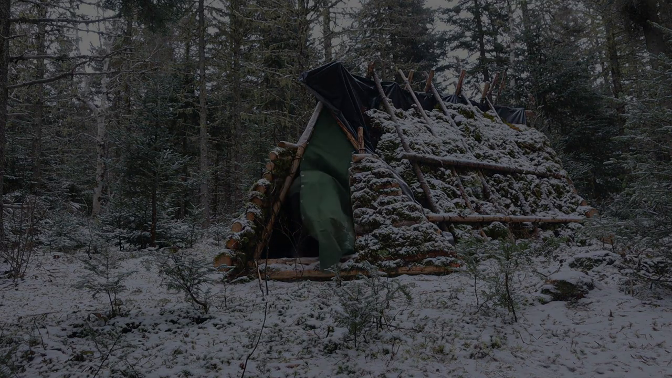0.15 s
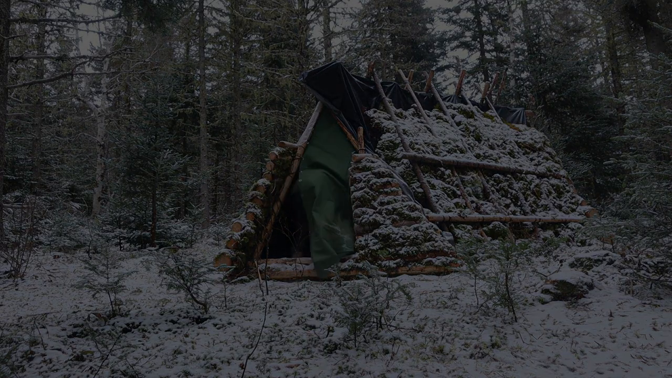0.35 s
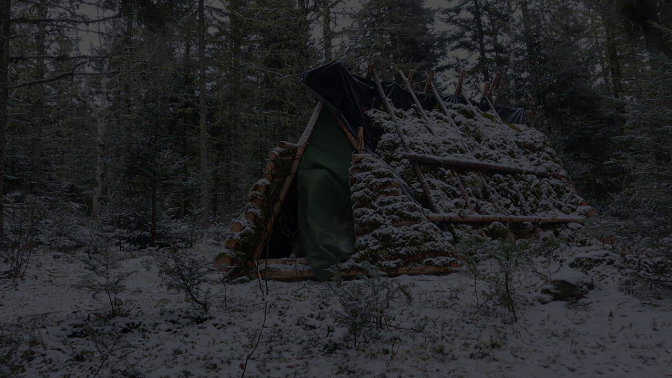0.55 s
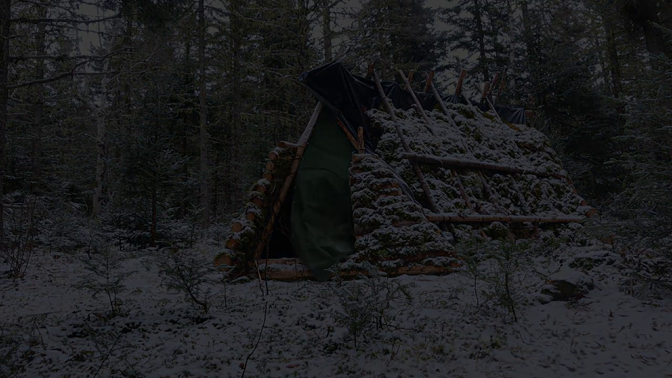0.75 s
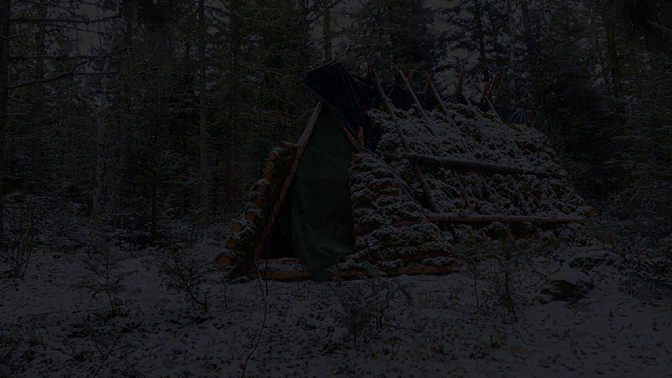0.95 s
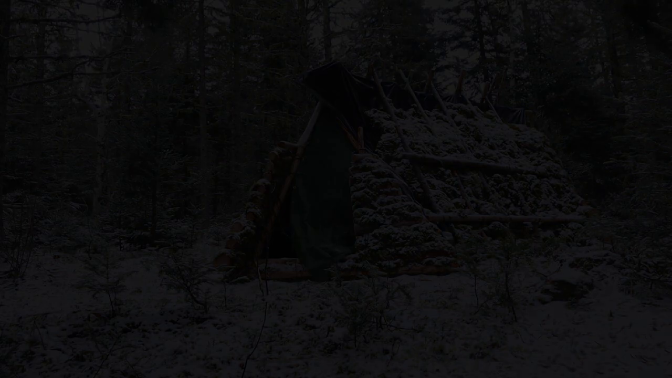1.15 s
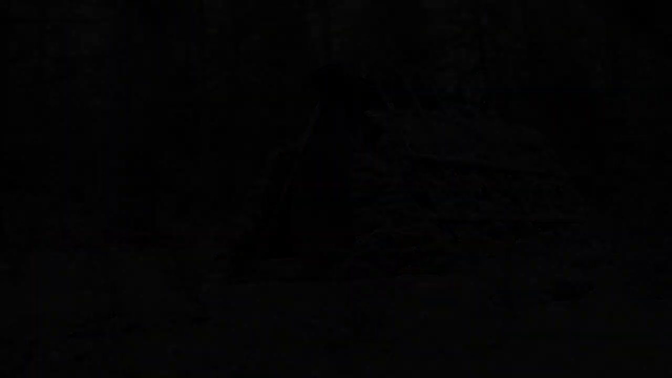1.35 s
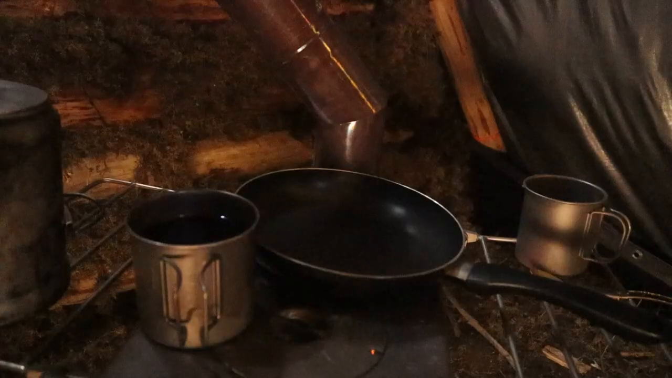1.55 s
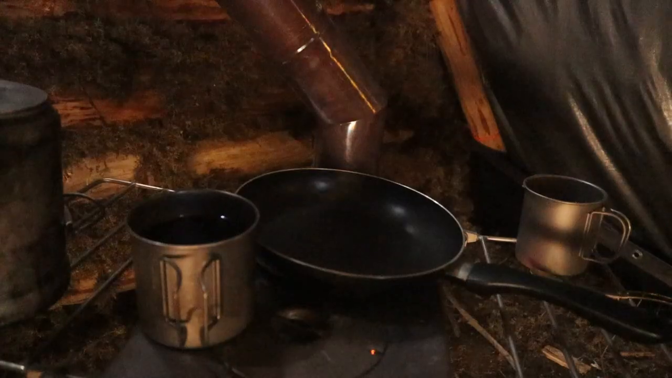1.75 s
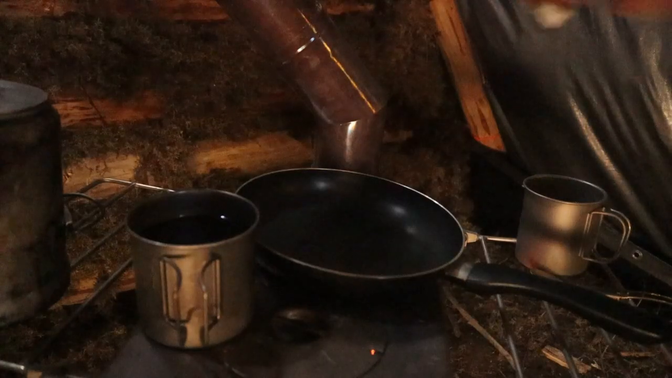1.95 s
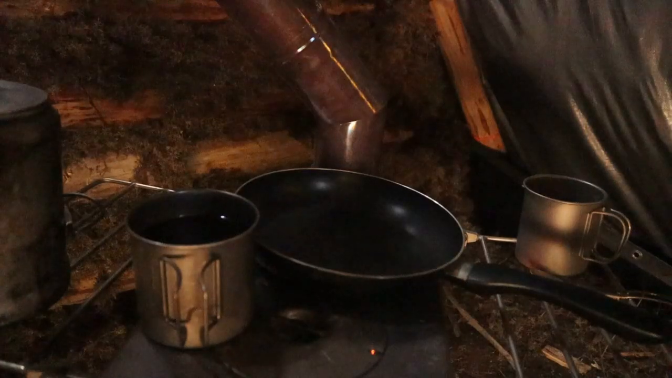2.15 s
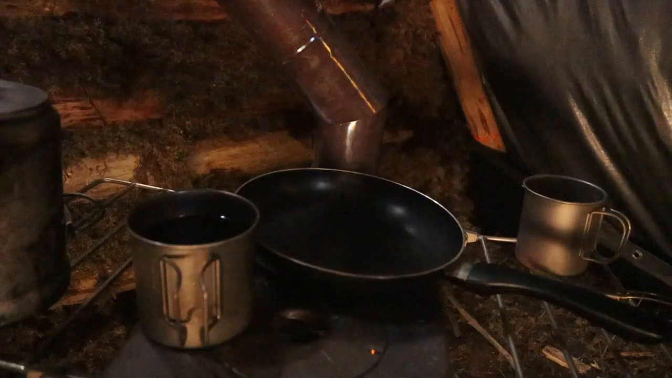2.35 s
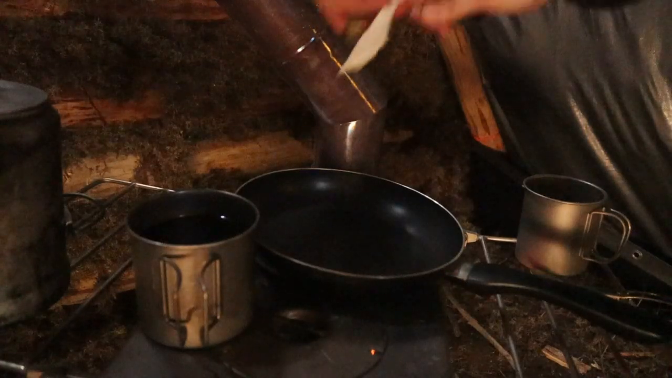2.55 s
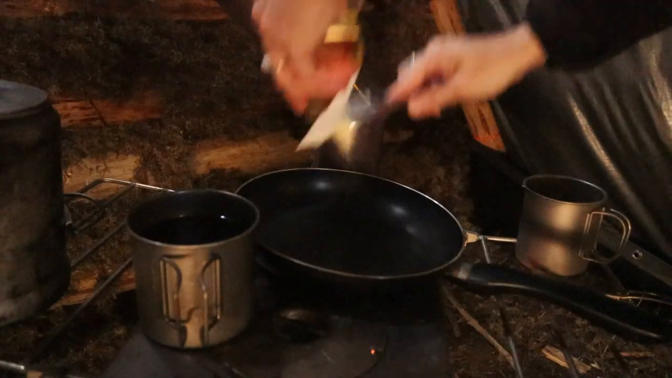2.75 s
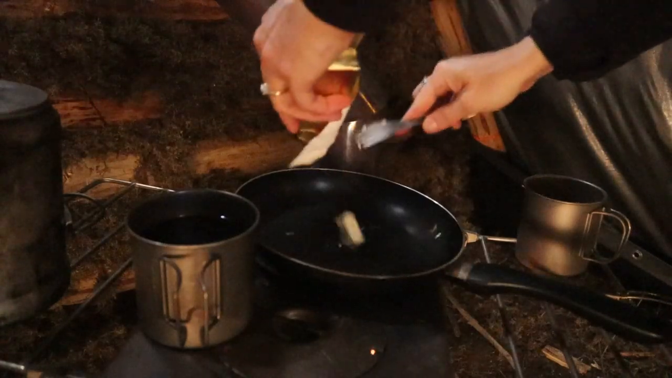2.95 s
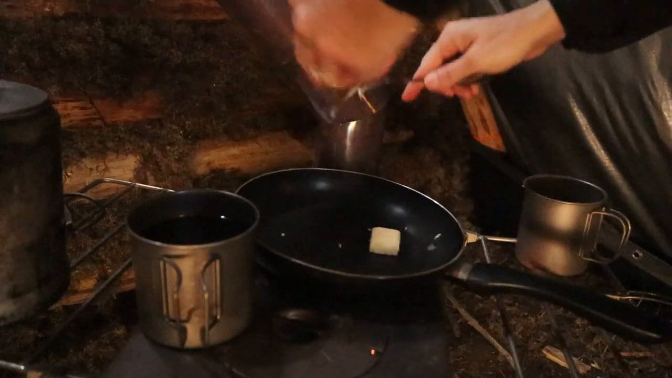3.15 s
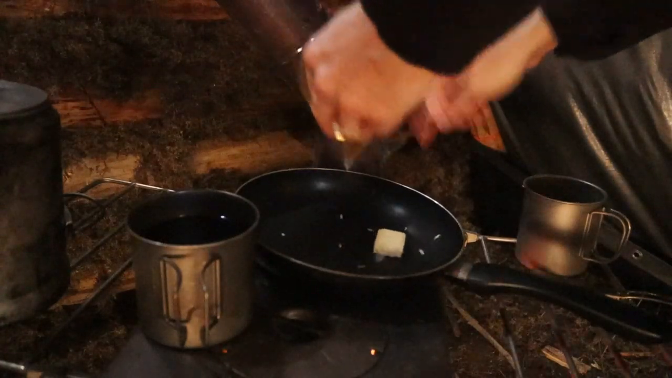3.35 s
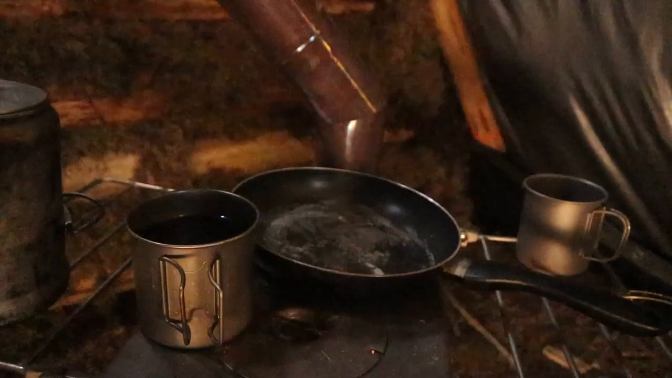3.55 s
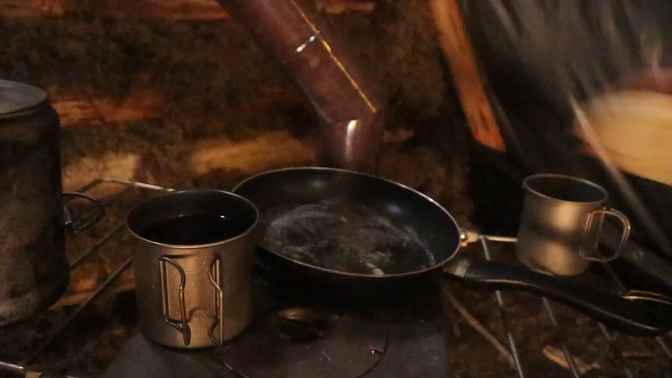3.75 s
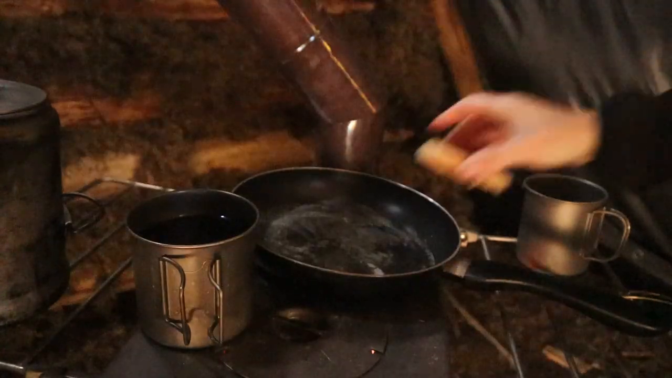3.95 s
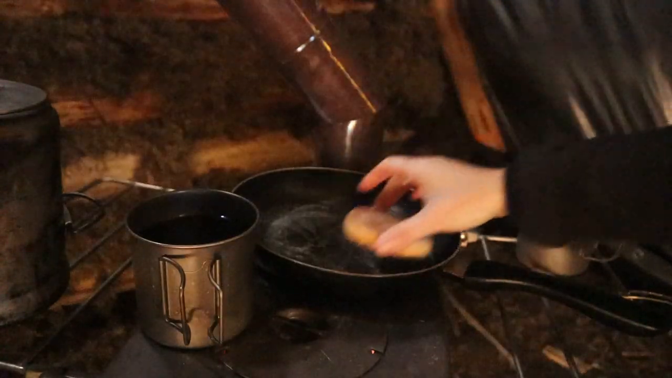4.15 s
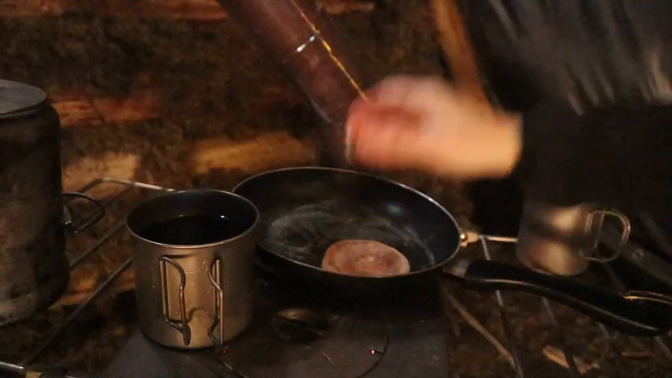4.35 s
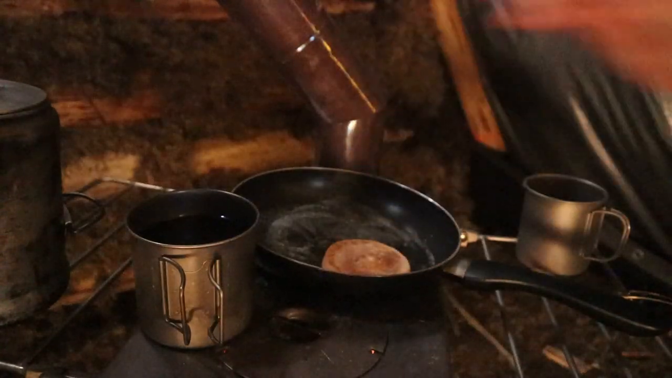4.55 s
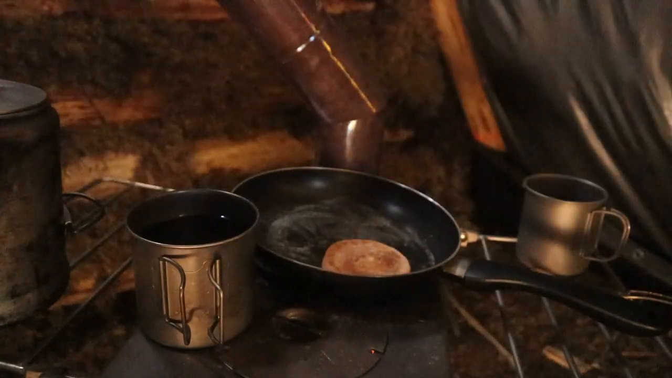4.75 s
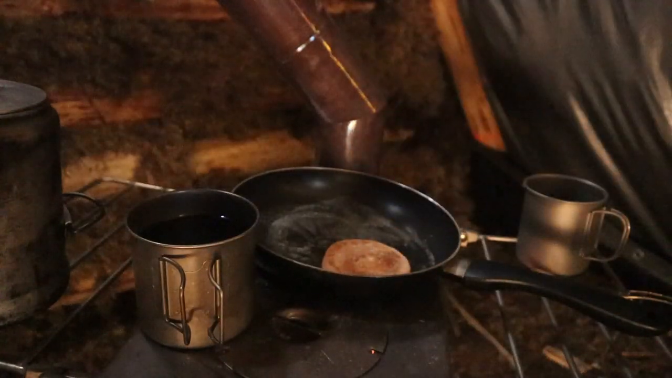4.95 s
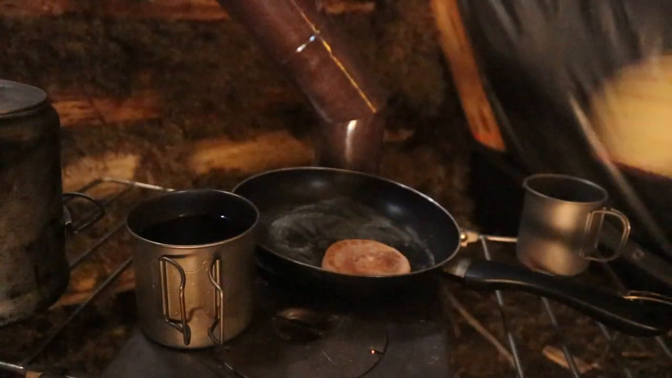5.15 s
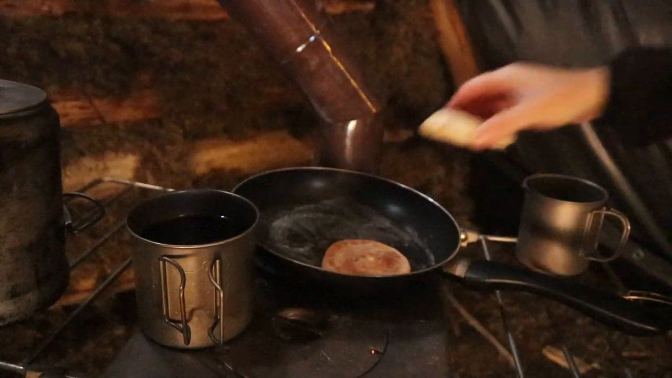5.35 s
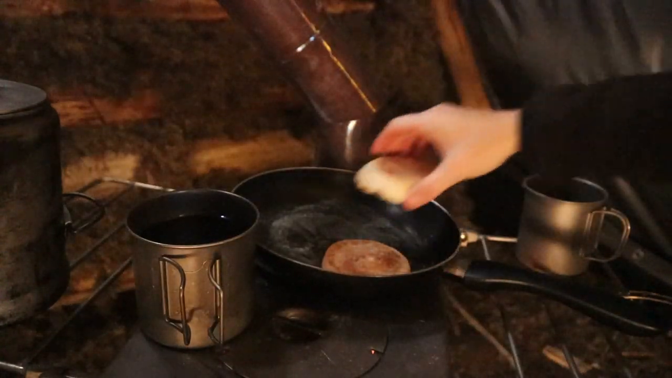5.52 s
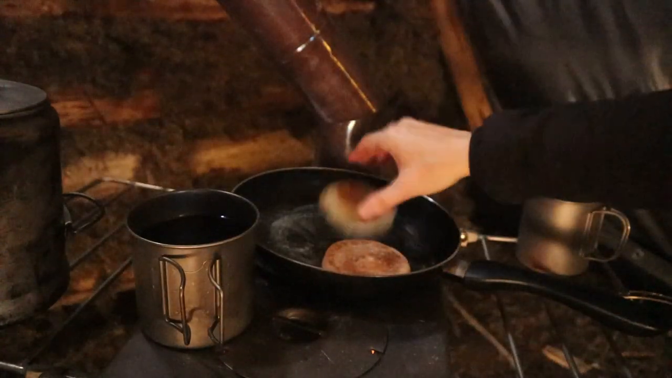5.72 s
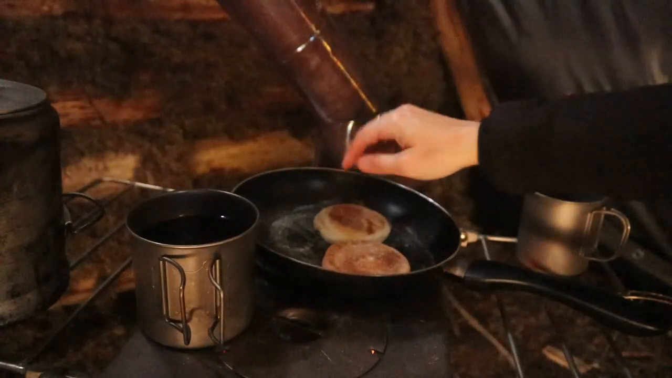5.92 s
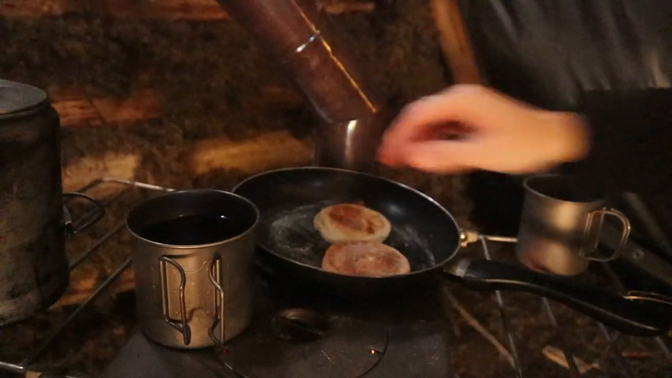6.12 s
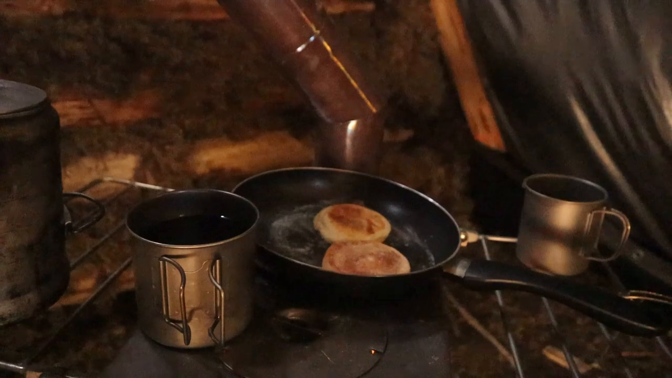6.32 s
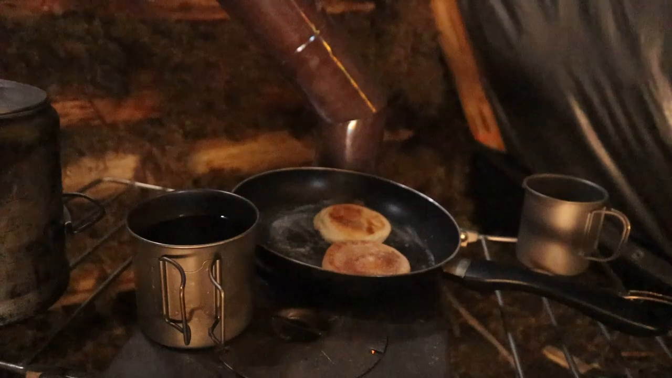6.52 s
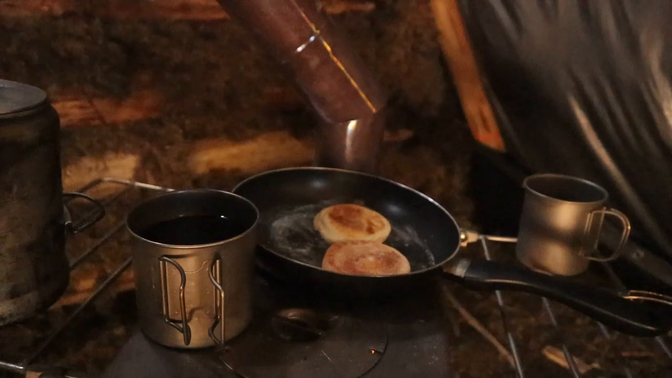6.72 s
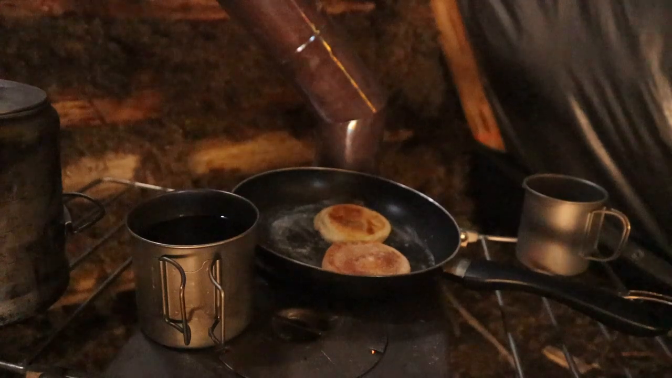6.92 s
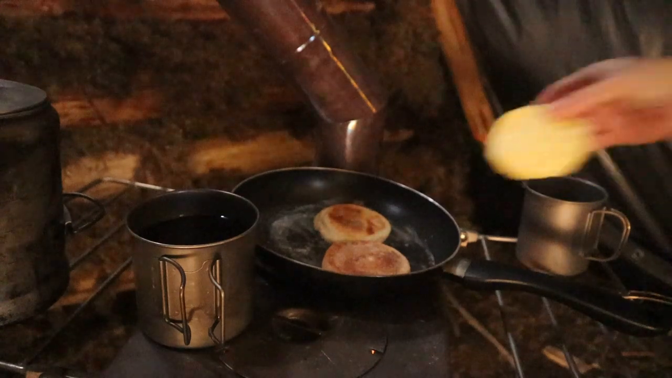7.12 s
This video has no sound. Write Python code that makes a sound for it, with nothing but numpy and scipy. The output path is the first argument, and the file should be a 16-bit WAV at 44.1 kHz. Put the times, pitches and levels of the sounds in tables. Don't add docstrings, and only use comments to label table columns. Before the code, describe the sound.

A steady soft hiss and low draughty rumble lie underneath. From 0 to 1.5 s, outside, a coarse tarp door rustles, strongest at first, with a dull footfall at once, a softer thump near 0.5 and a deep double step at 1.2. At 1.5 the scene cuts to a stove inside: a stiff wrapper crinkles and snaps, with small knocks, a heavier bump at 2.06, a sharp snap at 2.4 and knife ticks around 2.7. At 2.9 butter cracks into the bare pan, bright, ringing and briefly overloaded, bouncing more softly at 3.07. Wrapper clicks follow, cut by a tiny silence at 3.44. Then it is quieter: hiss and sleeves. A bun slaps down at 4.29 with a short rattle and low stove boom. Cloth swishes and a snap come near 5.4; the second bun lands at 5.8, drier. Faint taps near 6.6 and 6.9 and a soft final thud at 7.1.

```python
import sys
import numpy as np
from scipy import signal
from scipy.fft import rfft, irfft, next_fast_len
from scipy.io import wavfile
from scipy.ndimage import uniform_filter1d

SR = 44100
rng = np.random.default_rng(int(sys.argv[2]) if len(sys.argv) > 2 else 0)


def makeup_ratio(level_db):
    decades = np.asarray(level_db, float) / 20
    return 10 ** decades


def generate_wav(sig):
    pcm = np.round(np.clip(np.atleast_2d(sig).T, -1, 1) * 32767).astype(np.int16)
    wavfile.write(sys.argv[1], SR, pcm)


N = 316638


def evened(x):
    return x / np.sqrt(np.mean(x ** 2) + 1e-20)


def read(points, hz):
    f, value = np.transpose(points)
    return np.interp(np.log(hz + 1), np.log(f + 1), value)


def add(mix, s, sound):
    part = mix[round(s * SR):][:len(sound)]
    part += sound[:len(part)]


def coloured(x, points):
    size = next_fast_len(len(x))
    gain = makeup_ratio(read(points, np.fft.rfftfreq(size, 1 / SR)))
    return irfft(rfft(x, size) * gain, size)[:len(x)]


def seconds(length):
    return np.arange(round(length * SR)) / SR


def wavering(size, smooth):
    return evened(uniform_filter1d(rng.standard_normal(size), size=smooth))


def ring(modes, t):
    return sum(makeup_ratio(db - 60 * t / t60) * np.sin(2 * np.pi * hz * t) for hz, db, t60 in modes)


def swells(t, rows):
    return np.array([makeup_ratio(db - 10 * np.maximum((s - t) / rise, (t - s) / fall)) ** 2
                     for s, db, rise, fall, *_ in rows])


# f/Hz, level/dB per Hz
SOFT_HISS = [(120, -33), (200, -6.5), (249, -12.5), (380, -1.5), (464, -3), (600, -2), (1940, -6.5),
             (2410, -6.5), (2900, -7), (6370, -7.5), (12300, -13.5), (15100, -15.5), (15900, -25)]


def microphone_hiss():
    return makeup_ratio(-61.5) * evened(coloured(rng.standard_normal(N), SOFT_HISS))


# f/Hz, level/dB per Hz
RUMBLE = [(12, -28), (20, -21), (30, -16), (45, 1), (113, -2.5), (161, -3), (253, -5.5), (300, -4.5),
          (390, -20), (660, -120)]
# peak t/s, level/dB, rise/s per 10 dB, fall/s per 10 dB
DRAUGHTS = [(.11, -48, 0.66, 0.21), (.99, -50, 0.3, 0.3), (1.66, -49, 0.3, 0.08), (2.13, -47, 0.15, 0.15),
            (2.56, -47, 0.2, 0.15), (3.0, -46, 0.1, 0.2), (3.36, -51.5, 0.5, 0.25),
            (3.96, -50.5, 0.17, 0.11), (4.5, -48, 0.18, 0.25), (4.95, -57, 0.18, 0.6),
            (5.93, -52.5, 0.3, 0.4), (6.72, -57, 0.5, 0.5)]


def draught_rumble(t, rest_db):
    noise = evened(coloured(rng.standard_normal(len(t)), RUMBLE))
    return noise * np.sqrt(makeup_ratio(rest_db) ** 2 + swells(t, DRAUGHTS).sum(0))


def rustle(shot, moves, colour, patchy_db, flicker_db, crackle_db, slips_per_s):
    start, end, rest_db, rumble_db = shot
    size = round((end - start) * SR)
    t = start + np.arange(size) / SR

    slip_sizes = makeup_ratio(1.3 * np.minimum(rng.exponential(1, size), 5))
    slips = slip_sizes * (rng.random(size) < slips_per_s / SR)
    slips = signal.oaconvolve(slips, makeup_ratio(-60 * seconds(.01) / 0.0031))[:size]
    drive = rng.standard_normal(size) * (1 + makeup_ratio(crackle_db) * evened(slips))

    hz, at, z = signal.stft(drive, SR, nperseg=256, noverlap=192)
    patches = uniform_filter1d(rng.standard_normal(z.shape), size=3, axis=0)
    patches = evened(uniform_filter1d(patches, size=30, axis=1))
    flicker = wavering(len(at), 14)
    z = z * makeup_ratio(patchy_db * patches + flicker_db * flicker)
    drive = signal.istft(z, SR, nperseg=256, noverlap=192)[1][:size]

    hiss = coloured(drive, colour)
    body = coloured(hiss, [(1500, 0), (2500, -6), (5000, -30)])
    power = swells(t, moves)
    brightness = makeup_ratio(np.array(moves)[:, 4]) ** 2
    dull_level = np.sqrt(makeup_ratio(rest_db) ** 2 + power.sum(0))
    bright_level = np.sqrt(makeup_ratio(rest_db) ** 2 + brightness @ power)
    sound = evened(body) * dull_level + evened(hiss - body) * bright_level
    sound = sound + makeup_ratio(-4.5) * draught_rumble(t, rumble_db)
    return start, sound * np.minimum(np.arange(size) / 150, 1)


# start t/s, end t/s, rustle level at rest/dB, rumble level at rest/dB
SHOTS = [
    (0, 1.505, -59, -58.5),
    (1.512, 3.432, -56, -56),
    (3.444, 7.18, -64, -59.5),
]
# f/Hz, level/dB per Hz
TARP = [(120, -16), (200, -2.5), (258, -8), (299, -7), (464, -4), (528, -7), (611, -0.5), (1370, 1.5),
        (2240, -7.5), (3300, -5.5), (3960, -12), (8240, -12.5), (9200, -15), (10000, -25), (12800, -18),
        (14400, -24), (15900, -27)]
# peak t/s, level/dB, rise/s per 10 dB, fall/s per 10 dB, brightness/dB
TARP_MOVES = [
    (.09, -44, 0.15, 0.12, -3),
    (.21, -42, 0.4, 0.25, -1),
    (.41, -46.5, 0.1, 0.22, 1.5),
    (.66, -53.5, 0.06, 0.2, 1),
    (.97, -53, 0.64, 0.35, -5.5),
]


def tarp_rustle():
    return rustle(SHOTS[0], TARP_MOVES, TARP, 1.5, 0.43, -21, 660)


# t/s, peak level/dB, f/Hz, t60/s
THUMPS = [(0.04, -19, 166, 0.03), (.08, -36, 249, 0.056), (0.457, -35.5, 190, 0.0344),
          (0.661, -46.5, 255.7, 0.17), (.785, -49, 155.5, 0.14), (.86, -46, 253.2, 0.16),
          (0.893, -35, 259, 0.069), (1.1697, -31, 160.4, 0.096), (1.1837, -29.5, 155, 0.081),
          (1.525, -40, 137, 0.062), (2.0635, -25.5, 191, 0.1), (3.6, -44, 119, 0.16),
          (3.661, -45, 124.7, .1), (3.795, -43.5, 124, 0.119), (7.071, -51.5, 100, .1),
          (7.136, -43.5, 110, 0.102)]


def thump(s, db, hz, t60):
    t = seconds(0.35)
    wobble = 1 + 0.26 * wavering(len(t), 300)
    body = ring([(hz, db, t60), (1.354 * hz, db - 12.5, t60)], t)
    return s, body * wobble * np.minimum(t / 0.003, 1)


# t/s, peak level/dB, f/Hz, t60/s
BOOMS = [
    (.04, -32.5, 68.5, 0.34),
    (1.171, -35.5, 55.84, 0.81),
    (1.525, -45.5, 49.8, 0.72),
    (2.061, -37.5, 51.32, 0.95),
    (7.09, -50.5, 59, 0.97),
]


def ground_boom(s, db, hz, t60):
    t = seconds(.7)
    wobble = 1 + 0.24 * wavering(len(t), 300)
    sag = hz * (1 + 0.8 * np.exp(-t / 0.03))
    phase = 2 * np.pi * np.cumsum(sag * wobble) / SR
    return s, makeup_ratio(db - 60 * t / t60) * np.sin(phase) * np.minimum(t / 0.038, 1)


# t/s, peak level/dB, f/Hz, t60/s
KNOCKS = [(1.173, -37, 880, 0.031), (1.521, -38, 1130, 0.056), (1.726, -36, 800, 0.039),
          (1.757, -33, 700, 0.02), (2.064, -29, 2100, 0.031), (2.0645, -23, 380, 0.06),
          (2.372, -33, 740, 0.04), (2.763, -34, 1500, 0.04), (3.308, -29.5, 1300, 0.06),
          (3.312, -34, 800, .05), (3.322, -39, 680, .04), (3.295, -40, 620, .08), (3.349, -37, 684, 0.083),
          (3.354, -35, 650, .06), (3.364, -39, 560, .06), (4.689, -41, 1360, 0.032),
          (5.093, -41, 516, 0.03), (5.266, -39.5, 608, 0.034), (5.389, -33, 640, 0.05),
          (5.421, -29.5, 479, 0.029), (5.739, -34.5, 800, 0.0166), (6.567, -37, 842, 0.025),
          (6.611, -40, 640, 0.05), (6.942, -44, 1300, 0.031), (6.888, -47.5, 1500, .03),
          (2.553, -28, 1010, .03), (1.9, -32.5, 890, 0.031), (2.0635, -25, 880, 0.029),
          (2.071, -26, 1590, .03), (2.097, -37, 2450, .03), (2.112, -34, 2880, .04),
          (2.048, -34, 3300, .015), (1.82, -36, 700, .03), (1.811, -30.5, 2450, 0.078),
          (1.818, -31, 2900, .05), (1.986, -33, 1900, 0.046), (1.992, -32, 2450, .07),
          (1.68, -36, 800, .025), (1.702, -34, 780, .03), (1.918, -35, 950, .04), (2.679, -33, 528, .03),
          (1.635, -31, 1250, .05), (6.6145, -37, 600, .05)]


def knock(s, db, hz, t60):
    t = seconds(.15)
    puff_colour = [(hz / 3, -20), (hz, 0), (1.7 * hz, -14), (9000, -34), (16000, -45)]
    puff = evened(coloured(rng.standard_normal(len(t)), puff_colour))
    swing = (.3 + 1.6 * np.exp(-t * hz * .6)) * np.sin(2 * np.pi * hz * t)
    swing = swing * np.minimum(t * hz / 1.1, 1)
    return s, makeup_ratio(db - 60 * t / t60) * (swing + 0.55 * puff * np.minimum(t * hz, 1))


# t/s, peak
# level/dB, f/Hz, rise/ms
TICKS = [(2.7033, -26, 1300, .6), (2.7105, -33, 800, .8), (2.7408, -21, 1400, .65), (2.7582, -24, 1400, .8),
         (2.7797, -24, 1400, .6), (2.8242, -33, 1600, .5), (2.6868, -34, 900, .6), (3.2452, -31, 600, .8),
         (3.2506, -27, 750, .8), (3.2565, -37, 550, 1.2), (3.2225, -37, 500, 1.2), (3.3985, -31, 1500, .6),
         (3.4045, -32, 2200, .7), (3.4052, -31, 3700, .6), (2.9087, -11, 3400, .45),
         (2.3692, -21.5, 950, .9), (2.0628, -19, 1650, .7), (1.1742, -37, 1250, .8),
         (4.1515, -36, 620, 1.6), (4.1568, -41, 1300, .7), (1.7548, -22, 900, .6), (1.587, -27, 1000, .5),
         (1.7305, -29, 900, .8), (6.5705, -34, 1500, .4), (2.399, -26, 2500, .4), (1.899, -30, 1000, .6)]


def tick(s, db, hz, rise_ms):
    t = seconds(.02)
    u = t * 1000 / rise_ms
    first = makeup_ratio(db) * u ** 2 * np.exp(2 - 2 * u) * np.sin(2 * np.pi * hz * t)
    out = first.copy()
    echo_s, echo_db = .0037, -6.5
    add(out, echo_s, makeup_ratio(echo_db) * first)
    return s, out


# f/Hz, level/dB per Hz
WRAPPER = [(120, -32), (200, 0.5), (232, -5.5), (409, 1), (509, 4.5), (558, 0), (721, 3), (1300, -1),
           (2600, -8), (5210, -15), (6260, -12.5), (12800, -23.5), (15900, -27.5)]
# peak t/s, level/dB, rise/s per 10 dB, fall/s per 10 dB, brightness/dB
WRAPPER_MOVES = [(1.54, -44.5, 0.113, 0.15, 5), (1.62, -39, 0.11, 0.13, -4), (1.83, -46, 0.21, 0.18, 1.5),
                 (1.94, -43.5, 0.18, 0.2, -9.5), (2.23, -45, 0.3, 0.22, 2), (2.33, -42.5, 0.117, 0.12, -6),
                 (2.44, -43.5, 0.091, 0.108, 1.5), (2.55, -38, 0.146, 0.097, 1.5),
                 (2.72, -42, .13, 0.137, -0.5), (3.0, -43.5, .1, 0.23, -16), (3.33, -49, .2, 0.36, -5.5)]


def wrapper_rustle():
    return rustle(SHOTS[1], WRAPPER_MOVES, WRAPPER, 1.5, 0.53, -11.5, 660)


# t/s, peak level/dB, lowest f/Hz,
# highest f/Hz, t60/s
SNAPS = [(1.8095, -25.5, 1700, 9100, 0.24), (1.884, -27, 1805, 5960, 0.092),
         (1.9842, -24, 1600, 8630, 0.115), (2.03, -38.5, 9000, 14000, 0.019),
         (2.393, -19.5, 900, 13000, 0.0745), (3.2294, -35, 10500, 13980, 0.029),
         (3.2464, -41, 2490, 8000, 0.053), (3.3105, -34, 1800, 9000, 0.065), (3.364, -38, 1500, 4500, .03),
         (3.2965, -39, 1500, 3500, .04), (3.3985, -26, 1300, 4000, 0.043), (3.4028, -23, 2000, 8640, 0.065),
         (5.4495, -25.5, 2000, 10900, 0.069), (6.972, -37, 2500, 13100, 0.05),
         (6.967, -42, 2500, 9000, .06), (6.894, -45, 2800, 4200, .04), (2.9175, -17, 7200, 9000, .05),
         (2.926, -24, 4500, 12000, .06), (2.9087, -20, 7000, 13000, .07), (3.064, -34, 6800, 10000, .08),
         (5.422, -34, 2000, 4500, .03), (1.822, -30, 1800, 4000, .05), (1.7545, -25, 900, 5000, .03),
         (1.729, -30, 900, 4500, .04), (1.587, -31, 1000, 5000, .04), (1.85, -32, 1500, 4000, 0.12)]


def snap(s, db, low_hz, high_hz, t60):
    t = seconds(.2)
    grain = rng.standard_normal(len(t)) * makeup_ratio(2.5 * wavering(len(t), 40))
    colour = [(low_hz / 2, -24), (low_hz, 0), (high_hz, -5), (high_hz, -16), (2.8 * high_hz, -28)]
    burst = evened(coloured(grain, colour))
    return s, makeup_ratio(db - 8.0 - 60 * t / t60) * burst * np.minimum(t / 0.00061, 1)


# f/Hz, level/dB, held/s
DOME = (873.2, 0, 0.0195)


def pan(modes, blows, clatter_t60, linger_db, linger_t60, clatter,
        dome_pitch=1, dome_rise_ms=0.089, dome_longer=1):
    t, out = seconds(.5), np.zeros(N)
    rung = ring(modes, t)
    hz, db, held = DOME
    dome_envelope = (1 - np.exp(-(t * 1000 / dome_rise_ms) ** 2)) * np.exp(-(t / held / dome_longer) ** 5.0)
    dome = makeup_ratio(db - 60 * t / .15) * dome_envelope * np.sin(2 * np.pi * hz * dome_pitch * t)
    for s, db, contact_ms, clatter_db, *dome_db in blows:
        push = np.sin(np.pi * np.clip(t[:200] * 1000 / contact_ms, 0, 1))
        response = rung + sum(makeup_ratio(dome_db)) * dome
        add(out, s, signal.oaconvolve(makeup_ratio(db) * push / push.sum(), response))

        noise = evened(coloured(rng.standard_normal(len(t)), clatter))
        dull = coloured(noise, [(150, -23), (600, -1.5), (3000, -8), (7000, -20)])
        bright_part = makeup_ratio(-60 * t / clatter_t60) * noise
        lingering_part = makeup_ratio(linger_db - 60 * t / linger_t60) * dull
        add(out, s, makeup_ratio(clatter_db) * (bright_part + lingering_part))
    return signal.sosfilt(signal.butter(4, 190, "high", fs=SR, output="sos"), out)


# f/Hz, level/dB
CLATTER = [(200, -15.5), (500, -0.5), (1100, 9.5), (1900, 0), (3000, 0.5), (5500, -10), (8000, -6),
           (11000, -22.5), (16000, -22)]
# f/Hz, level/dB, t60/s
EMPTY_PAN = [(802, -27, 0.4), (530, -28, .2), (889, -11, .19), (1147, -21, 0.35), (1490, -11, 0.1),
             (1873, -33, .3), (1230, -8, .025), (2310, -20, .15), (2750, -26, .15), (2945, -20, .13),
             (3290, -24, .1), (3554, -22, .04), (4450, -26, .15), (7800, -21, .045)]
# t/s, strength level/dB, contact/ms, clatter level/dB, pan-bottom level/dB
BUTTER = [
    (2.9074, -2.5, 0.25, -28, 1.5),
    (2.9087, -24, .1, -14.5, -20),
    (2.9165, -24, .15, -24, -20),
    (2.9272, -24, 0.15, -25.5, -20),
    (2.958, -33, 0.3, -39, -12),
    (2.973, -30, 0.3, -36, -20),
]


def butter_landing():
    return pan(EMPTY_PAN, BUTTER, 0.067, -12.5, .36, CLATTER)


# t/s, peak level/dB, f/Hz, rise/ms
SLAPS = [(2.908, -30.5, 400, 1.6), (3.07, -32, 309, 1.48), (4.2755, -32.5, 280, 3.3), (4.29, -6, 510, 1.1),
         (4.2945, -9.5, 347, 1.3), (4.303, -17.5, 233, 3.2), (5.7975, -15, 810, 0.68),
         (5.8005, -20.5, 347, 1.12), (5.8061, -3, 660, 1.05), (5.8075, -12.5, 360, 2.2),
         (5.8092, -13, 590, 1.1), (5.818, -27.5, 201.4, 6.5), (5.804, -24, 1150, 2.5),
         (5.805, -27, 1600, 2.2), (5.806, -30, 2050, 1.5), (4.292, -20, 640, 2.5), (5.8058, -29, 3400, 1.2)]


def slap(s, db, hz, rise_ms):
    t = seconds(.1)
    u = t * 1000 / rise_ms
    air = -makeup_ratio(db) * u * np.exp(1 - u) * np.sin(2 * np.pi * hz * t)
    return s, signal.sosfilt(signal.butter(2, 70, "high", fs=SR, output="sos"), air)


# t/s, boom level/dB
STOVE_BLOWS = [
    (2.908, -32),
    (3.071, -42),
    (4.288, -28),
    (5.802, -34),
]
# f/Hz, level/dB, t60/s
STOVE = [(87.2, -14.5, 0.9), (168.4, -3, .7), (220.1, -10, .6), (255, -6, 0.55), (292, -2, 0.36),
         (325, -4, 0.49), (400.8, -8, 0.43), (524, -12, 0.58), (694, -12, 0.54)]
# f/Hz, level/dB, t60/s
STOVE_NEAR = [(86.1, -21, 1.8), (174, -11, .7), (194, -3, .15), (221, -10.5, 1.1), (258, -5, 0.65),
              (291, -4, 0.5), (328, -8, 0.45), (363, -3, .2), (404, -12, 0.45), (578, -20, .6),
              (1017, -16, .35), (1184, -16, .25)]
# f/Hz, level/dB, t60/s
STOVE_FAR = [(86.1, -17, 1.1), (172, -11, 1.0), (221, -11, 1.4), (260, -9, .9), (291, -6, 0.5),
             (328, -16, 0.4), (398, -5, .35), (365, -12, .2), (818, -13, .35), (619, -9, .15),
             (1071, -15, .25), (1320, -18, .3), (1790, -15, .22), (480, -11, .25)]


def stove(s, boom_db, modes):
    t, boom = seconds(1.), 0
    for mode in modes:
        waver = evened(np.interp(t, np.arange(40) / 30, rng.standard_normal(40)))
        boom = boom + ring([mode], t) * (.95 + .12 * waver)
    return s, makeup_ratio(boom_db) * boom * np.minimum(t / 0.019, 1)


# f/Hz, level/dB, t60/s
RIM = [(275, -9, 0.3), (549, -18, 0.2), (889, 0, 0.2), (1152, -14, 0.13), (1500, -8, 0.06),
       (1780, -13, 0.06), (2255, -8, 0.06), (2275, -22, .15), (4350, -18, 0.13), (5350, -28, 0.054),
       (6950, -22, .06)]
# t/s, strength level/dB, contact/ms, clatter level/dB, pan-bottom level/dB
BOUNCE = [
    (3.0647, -22, 0.15, -36, -20),
    (3.0655, -36, 0.6, -50, 31.5),
]


def butter_bounce():
    return pan(RIM, BOUNCE, 0.056, -6, .3, CLATTER, 1.01, 11., 1.3)


# f/Hz, level/dB, t60/s
WALL = [(549, -11, .22), (695, -23, .3), (1152, 1, .155), (1491, -6, .05), (1885, -21, .08),
        (2560, -28, .065), (2940, -19, .16), (3150, -30, .1)]
# t/s, strength level/dB, contact/ms, clatter level/dB
REBOUND = [
    (3.0735, -21, .2, -41),
    (3.103, -46, .1, -40),
    (3.1165, -50, .1, -47),
]


def butter_rebound():
    return pan(WALL, REBOUND, .05, -8, .3, CLATTER)


# peak t/s, level/dB, rise/s per 10 dB, fall/s per 10 dB, brightness/dB
SLEEVE_MOVES = [(4.07, -50.5, 0.404, 0.2, -2), (4.2, -56.5, 0.158, 0.16, 5), (4.35, -49.5, 0.15, 0.17, -10),
                (4.58, -57, 0.147, 0.23, 2), (4.75, -54.5, 0.208, 0.61, -1), (5.15, -54, 0.14, 0.24, 1.5),
                (5.39, -42.5, 0.14, 0.12, -1), (5.62, -47.5, 0.114, 0.13, 0), (5.7, -44, 0.092, 0.098, 3),
                (6.17, -52.5, 0.18, 0.37, 1), (6.57, -49.5, 0.26, 0.0587, -1),
                (6.62, -48, 0.12, 0.03, -2.5), (6.8, -61, 0.11, 0.28, 0.5), (7.13, -53, 0.21, 0.36, -1.5)]


def sleeve_rustle():
    return rustle(SHOTS[2], SLEEVE_MOVES, SOFT_HISS, 1.43, 0.379, -17.0, 500)


# f/Hz, level/dB
SOFT_CLATTER = [(200, -13), (500, 1), (1100, 10), (1900, 2), (3000, -0.5), (5500, -8.5), (8000, -7),
                (16000, -30)]
# f/Hz, level/dB, t60/s
LOADED = [(582, -25, 0.4), (615, -26, .4), (703, -18, 0.3), (822, -15.5, 0.3), (880, -11, 0.11),
          (1020, -18.5, 0.36), (1120, -20, 0.17), (1420, -15, 0.08), (1505, -14.5, 0.13),
          (2170, -12.5, 0.049), (2466, -31, 0.18), (3290, -19, 0.041)]
# t/s, strength level/dB, contact/ms, clatter level/dB
FIRST_BUN = [
    (4.29, -16, 0.43, -20.5),
    (4.298, -18, 0.28, -31),
    (4.317, -19, 0.153, -27.5),
    (4.325, -20, 0.53, -28),
]


def first_bun():
    return pan(LOADED, FIRST_BUN, 0.058, -9.5, 0.26, SOFT_CLATTER)


# t/s, strength level/dB, contact/ms, clatter level/dB
SECOND_BUN = [
    (5.797, -30, 0.59, -30.5),
    (5.8055, -15.5, 0.3, -25.5),
]


def second_bun():
    smothered = [(hz, db, 0.266 * t60) for hz, db, t60 in LOADED]
    return pan(smothered, SECOND_BUN, 0.041, -14, 0.16, SOFT_CLATTER)


# f/Hz, t60/s
SHELTER = [(150, 0.93), (600, 0.1), (1500, 0.35), (4000, 0.24), (12000, 0.084)]


def shelter(x):
    taps = np.zeros(SR // 2)
    at = np.arange(200, len(taps) - 20, 20)
    taps[at + rng.integers(0, 20, len(at))] = rng.choice([-1., 1.], len(at))
    hz, t, z = signal.stft(taps, SR, nperseg=256)
    decay = makeup_ratio(-60 * t / read(SHELTER, hz)[:, None])
    tail = signal.istft(z * decay, SR, nperseg=256)[1]
    return signal.oaconvolve(x, tail / np.linalg.norm(tail))[:N]


def scene():
    bed = microphone_hiss()
    for sound in (tarp_rustle(), wrapper_rustle(), sleeve_rustle()):
        add(bed, *sound)
    for rows, source in ((THUMPS, thump), (BOOMS, ground_boom)):
        for row in rows:
            add(bed, *source(*row))

    hits = butter_landing() + butter_bounce() + butter_rebound() + first_bun() + second_bun()
    for rows, source in ((KNOCKS, knock), (TICKS, tick), (SNAPS, snap), (SLAPS, slap)):
        for row in rows:
            add(hits, *source(*row))
    for row, modes in zip(STOVE_BLOWS, (STOVE, STOVE, STOVE_NEAR, STOVE_FAR)):
        add(hits, *stove(*row, modes))
    hits += makeup_ratio(-20.5) * shelter(hits)

    change_s = 3.438
    gap = np.clip((abs(np.arange(N) / SR - change_s) - .005) / .002, 0, 1)
    hits[round(change_s * SR):round(4 * SR)] = 0
    return ((bed + hits) * gap)[None]


def top_cut(x):
    return signal.sosfilt(signal.butter(12, 15900, fs=SR, output="sos"), x)


def record(dry):
    limited = signal.oaconvolve(dry, signal.firwin(255, 15900, fs=SR)[None], "same")
    return top_cut(np.clip(limited, -1, 1))


dry = scene()
out = record(dry)
generate_wav(out)
```